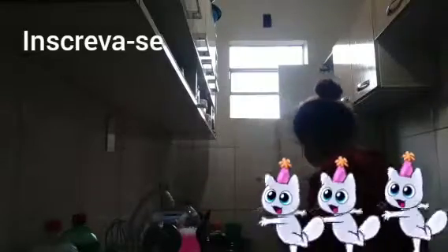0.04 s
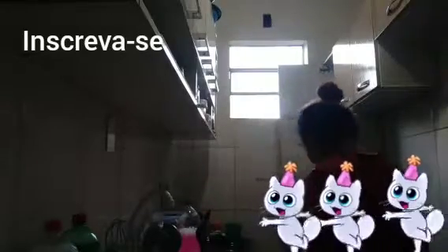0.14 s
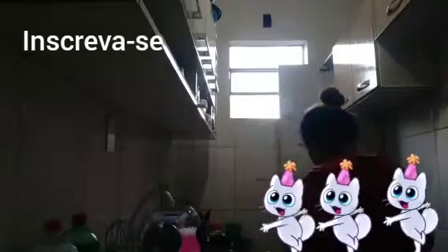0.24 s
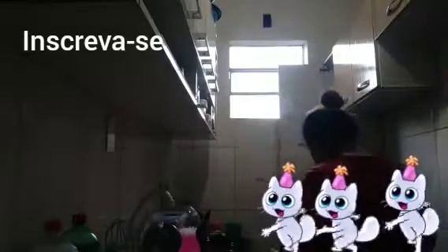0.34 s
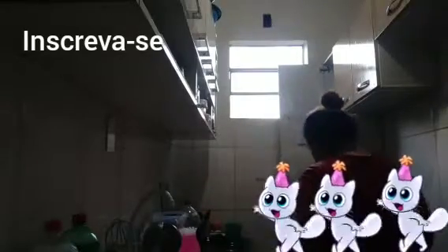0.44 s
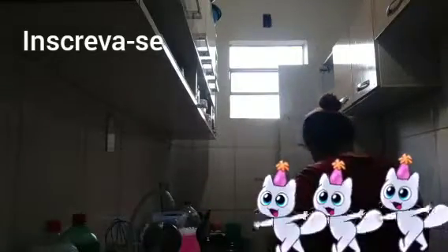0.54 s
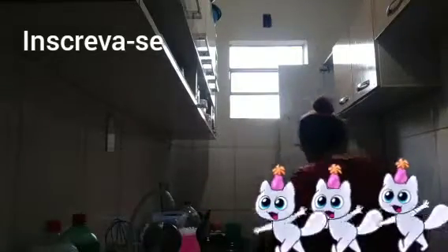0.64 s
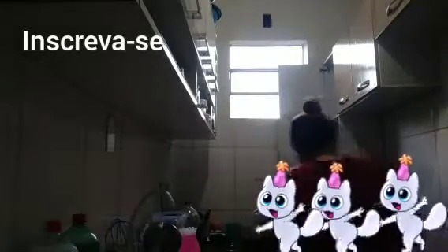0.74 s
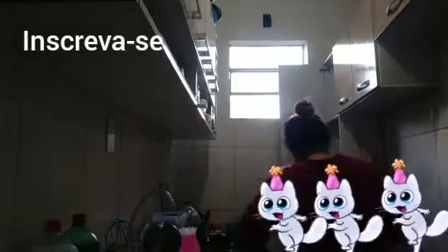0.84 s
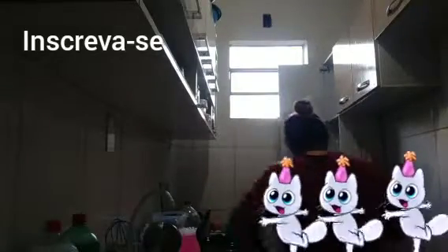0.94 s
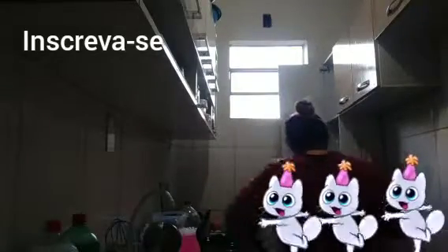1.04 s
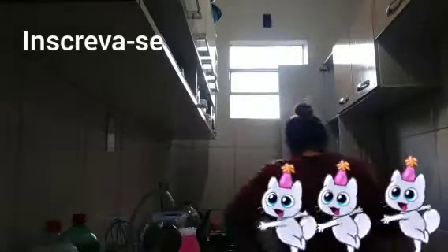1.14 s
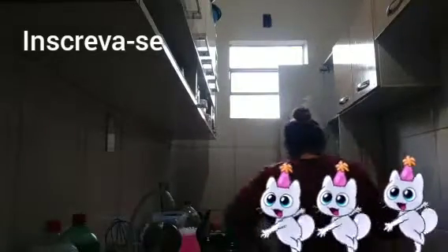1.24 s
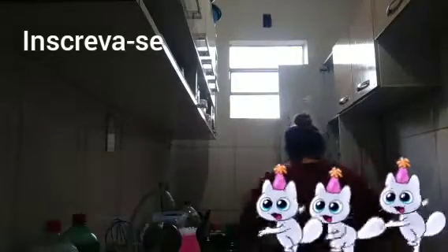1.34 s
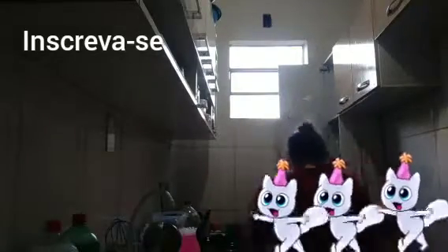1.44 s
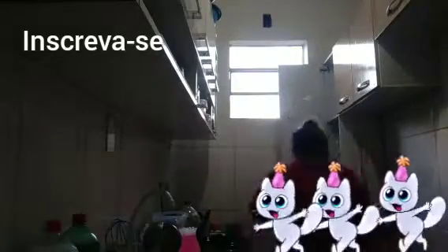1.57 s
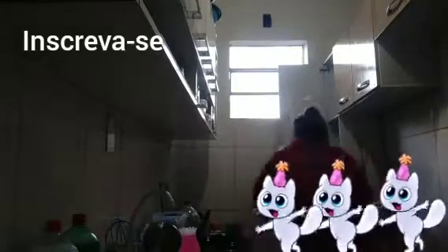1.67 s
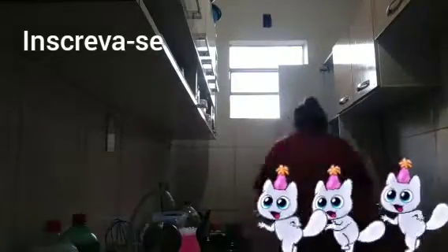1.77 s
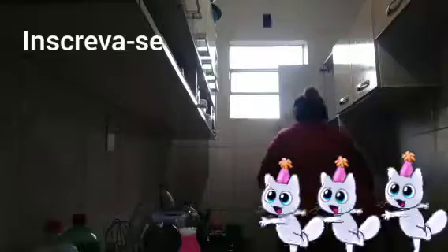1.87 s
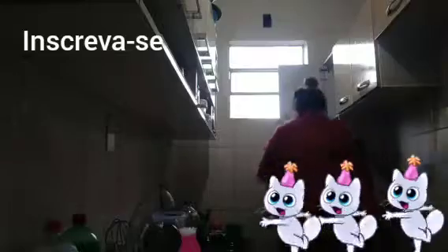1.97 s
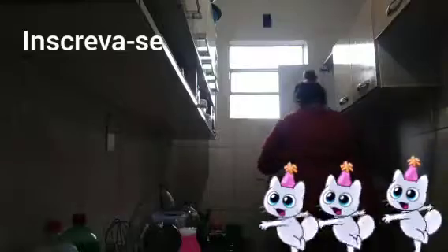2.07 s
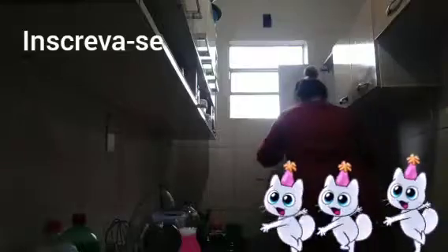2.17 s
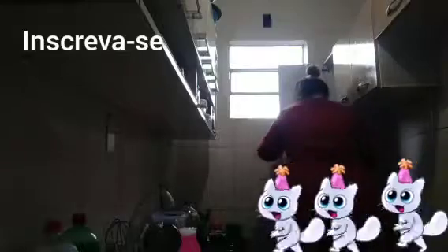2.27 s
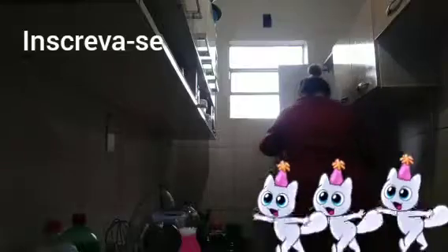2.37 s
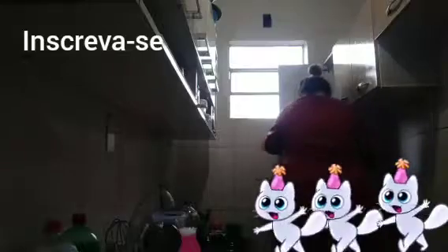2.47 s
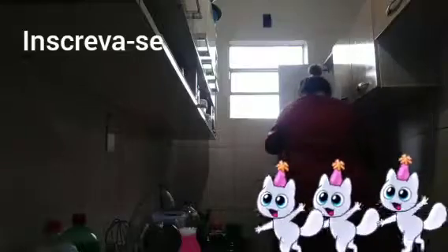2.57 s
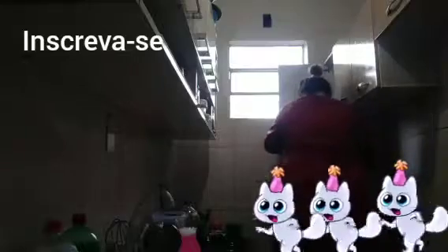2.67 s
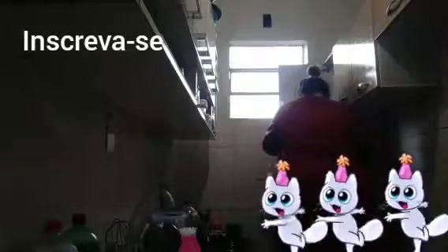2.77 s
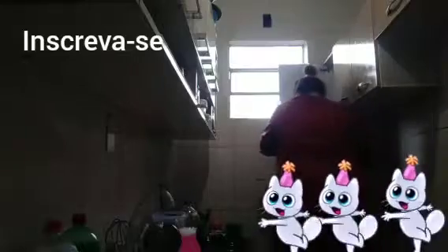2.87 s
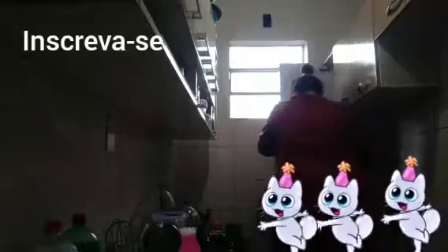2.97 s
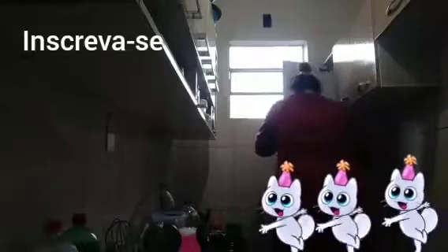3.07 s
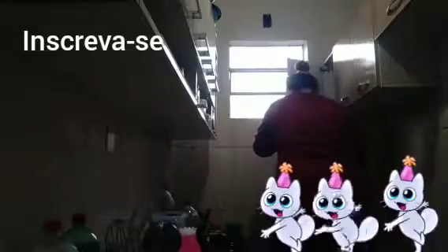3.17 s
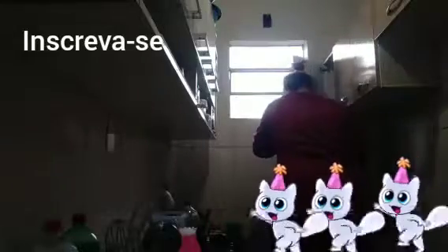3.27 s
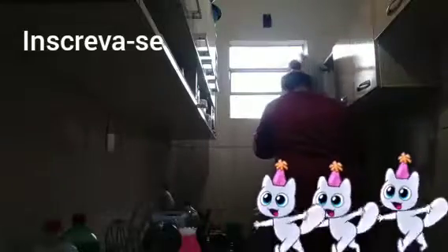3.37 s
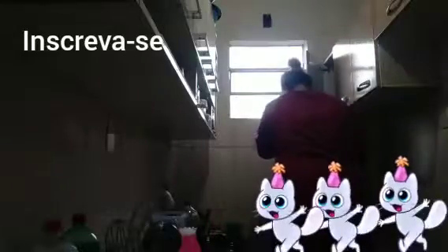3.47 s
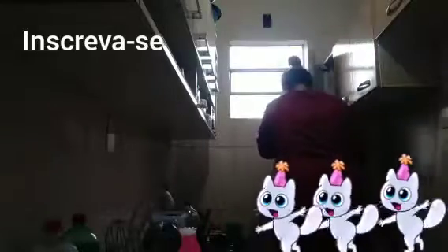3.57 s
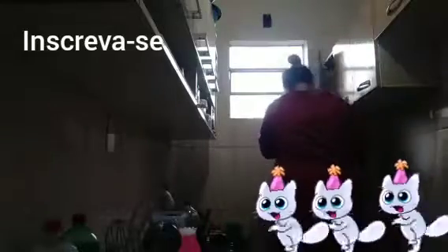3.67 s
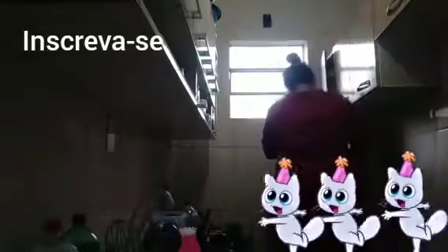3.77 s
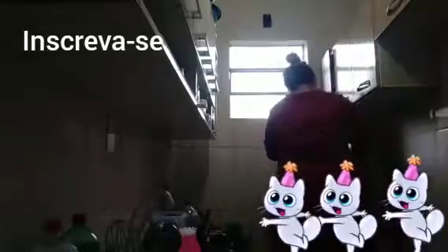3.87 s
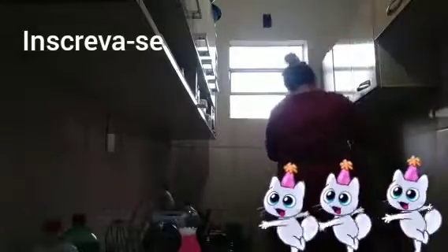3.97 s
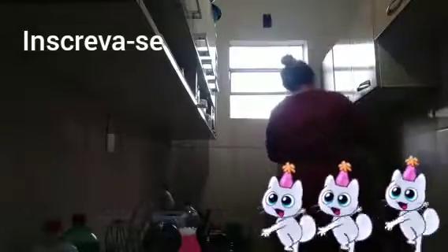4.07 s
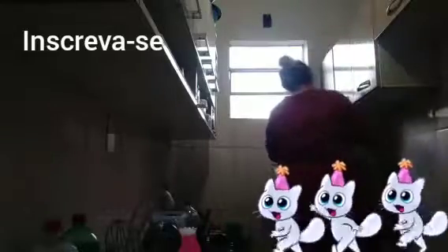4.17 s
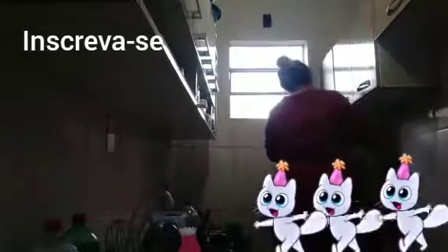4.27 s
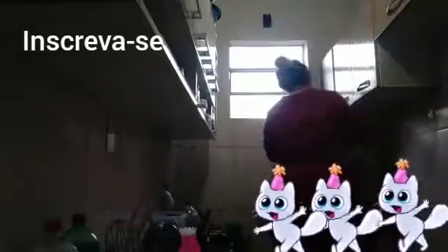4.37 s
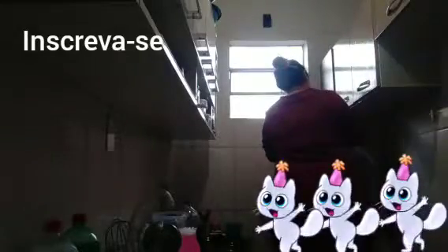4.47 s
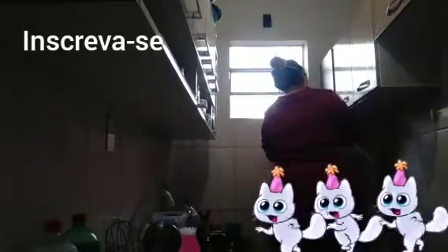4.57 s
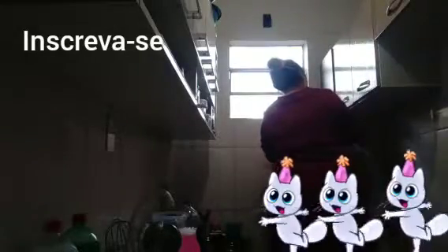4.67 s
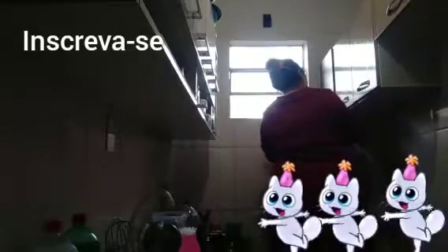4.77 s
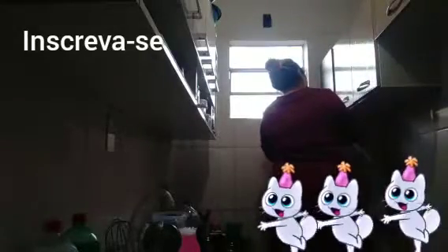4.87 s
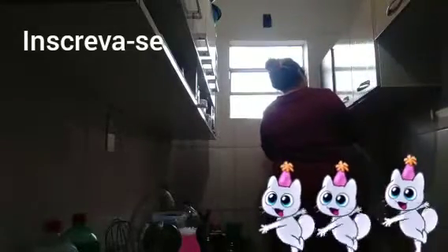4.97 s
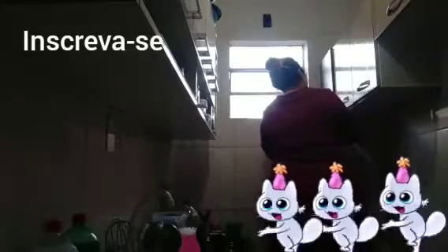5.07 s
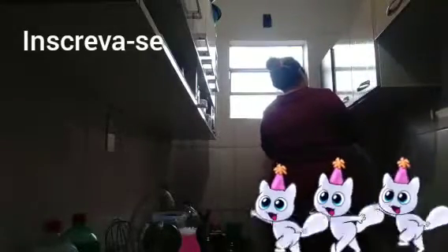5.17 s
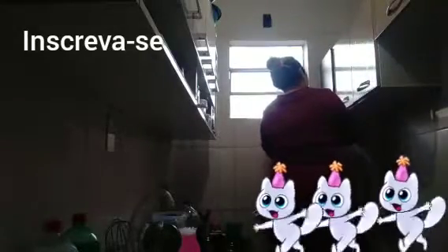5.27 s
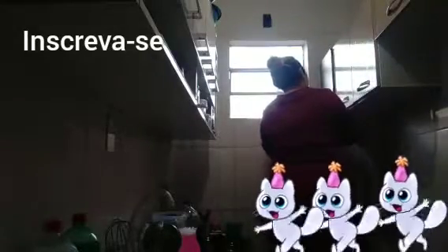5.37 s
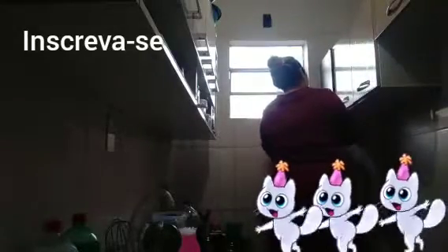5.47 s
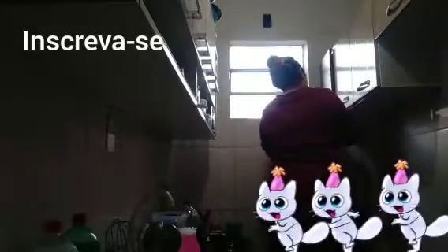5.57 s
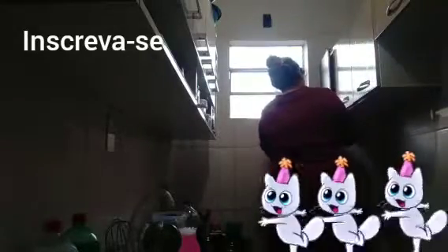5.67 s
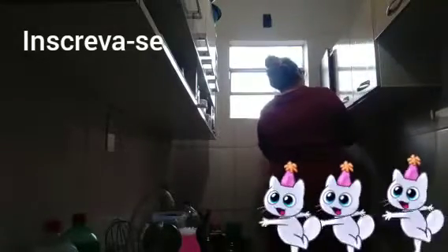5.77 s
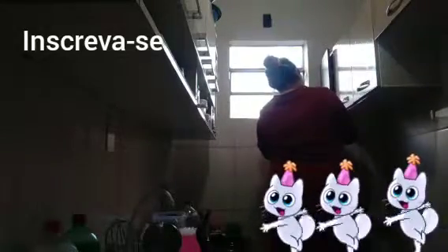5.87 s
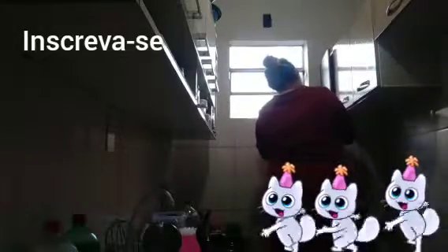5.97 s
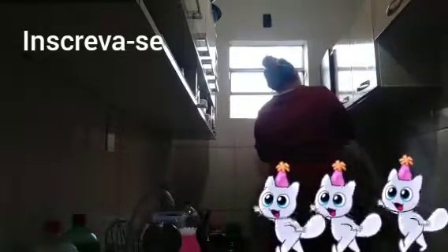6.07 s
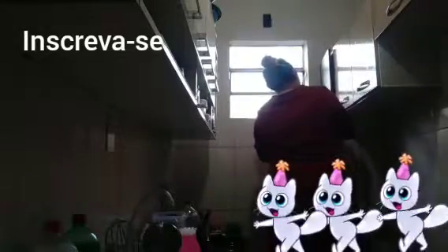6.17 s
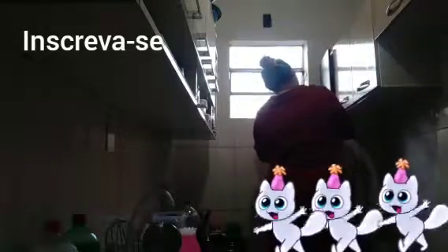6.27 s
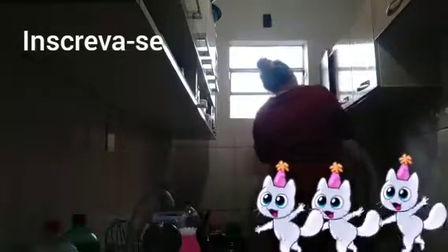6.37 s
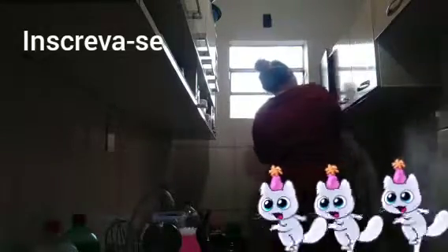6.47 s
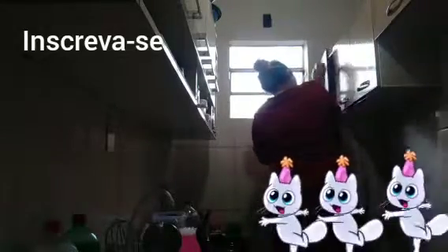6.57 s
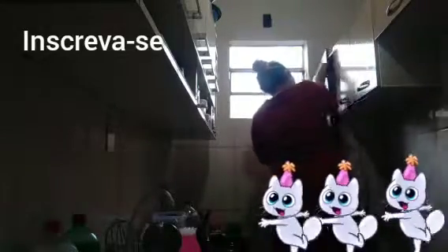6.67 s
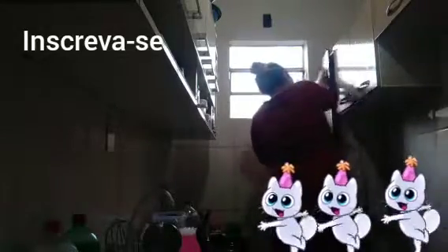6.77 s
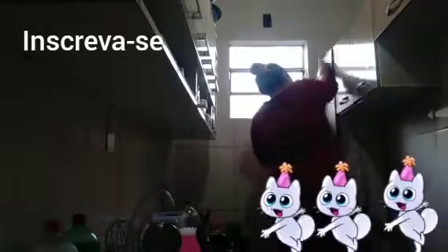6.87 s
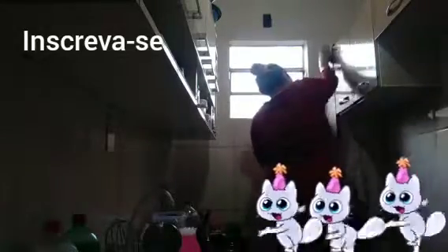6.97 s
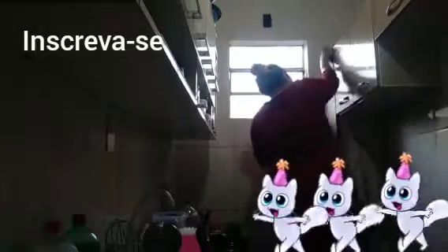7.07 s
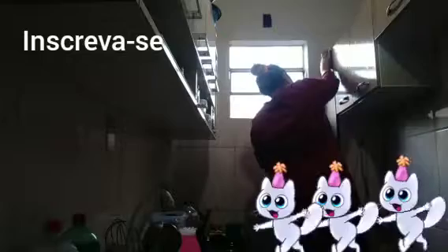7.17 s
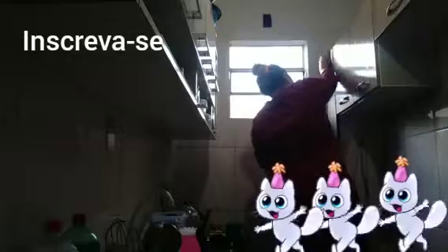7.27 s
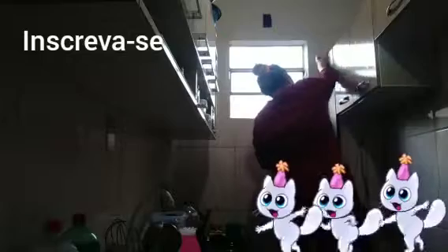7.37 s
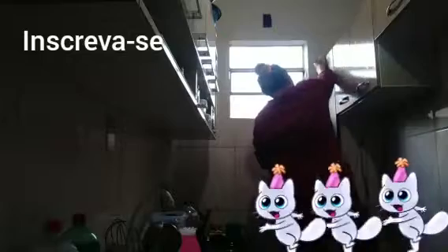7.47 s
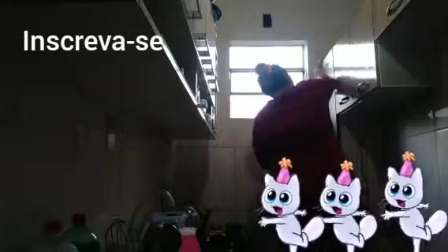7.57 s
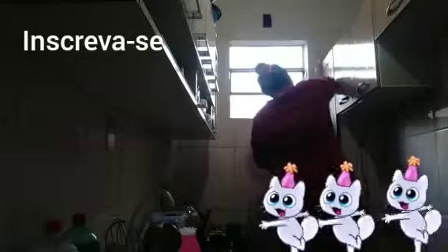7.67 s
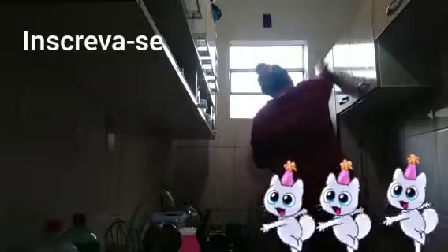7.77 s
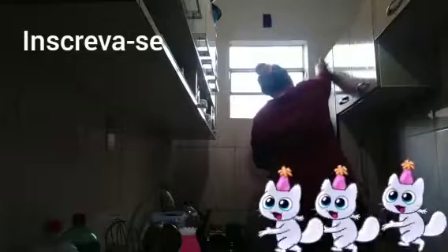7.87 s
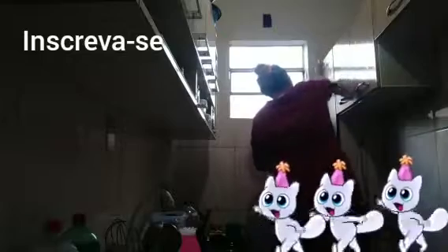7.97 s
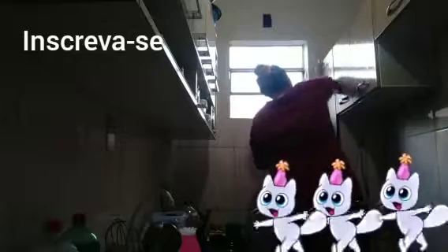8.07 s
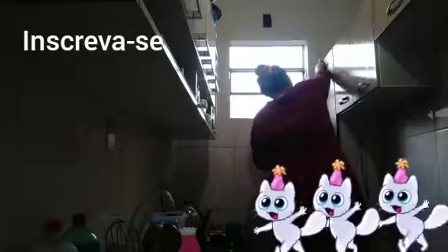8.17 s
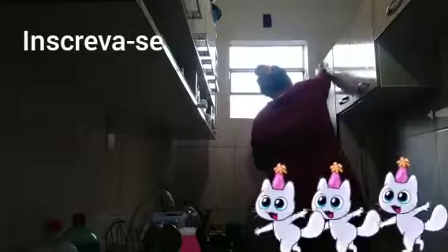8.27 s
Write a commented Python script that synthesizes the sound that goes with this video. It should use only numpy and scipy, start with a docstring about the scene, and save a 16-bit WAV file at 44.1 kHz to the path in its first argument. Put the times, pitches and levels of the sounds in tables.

```python
"""Sheet-steel wall-cabinet doors slam and bump in a narrow tiled kitchen: flexing doors swing as short sines
and knock on the ringing modes of sheet and carcass. A lower door bangs, a box taps and a catch springs open,
also as decaying modes. Small clicks, scuffs and rustles are shaped noise; hinges squeak and creak as stick-slip
overtones. The room answers with low modes and decaying noise tails over a hum and the hiss of a phone."""
import sys
import numpy as np
from scipy import signal
from scipy.fft import rfft, irfft
from scipy.io import wavfile
from scipy.ndimage import uniform_filter1d

SR = 44100
rng = np.random.default_rng(int(sys.argv[2]) if len(sys.argv) > 2 else 0)


def log_audio(samples):
    """Write samples as a 16-bit WAV file to the path given in sys.argv[1]."""
    # one column per channel
    frames = np.atleast_2d(samples).T
    # limit to full scale, then quantise
    limited = np.clip(frames, -1, 1)
    pcm = np.round(limited * 32767).astype(np.int16)
    wavfile.write(sys.argv[1], SR, pcm)


N = 367794  # samples


def undb(db):
    """Decibel law: level to amplitude ratio."""
    return 10 ** (np.asarray(db) / 20)


def unit(x):
    """Normalisation by the root mean square."""
    return x / np.sqrt(np.mean(x ** 2))


def band(x, hz, octaves, order=2):
    """Band-pass filtering of the given width around hz."""
    edges = np.clip(hz * 2 ** (np.array([-.5, .5]) * octaves), 10, SR / 2.1)
    return signal.sosfilt(signal.butter(order, edges, "bandpass", fs=SR, output="sos"), x)


def walk(rate):
    """Slow random modulation: levels drawn rate times a second and joined by ramps, spread near 1."""
    k = int(SR / rate)
    held = np.repeat(rng.standard_normal(N // k + 1), k)
    return 1.37 * uniform_filter1d(held, k)[:N]


def swell(start, rise, hold, db, fade):
    """Linear attack, hold and exponential decay: a gain that fades by so many dB a second."""
    t = np.arange(N) / SR - start
    attack = np.clip(t / max(rise, .002), 0, 1)
    fading = np.clip(t - rise - hold, 0, 2)
    return attack * undb(db - max(fade, 5) * fading)


def ring(modes, size=SR):
    """Modal superposition: decaying sines set off by one sharp push, scaled to peak 1."""
    t = np.arange(size) / SR
    out = np.zeros(size)
    for k, (hz, db, t60) in enumerate(modes):
        decay = 1000. ** (-t / t60)
        out += (-1) ** k * undb(db) * np.sin(2 * np.pi * hz * t) * decay
    return out / np.abs(out).max()


def add(out, s, x):
    """Linear superposition: mixes x into out from time s."""
    i = int(s * SR)
    out[i:i + len(x)] += x[:N - i]


# Steady noise spectrum. Each row: frequency in Hz, relative level per Hz in dB.
FLOOR = [(15, -16), (25, 2.5), (86, -7.5), (116, -2.5), (144, -10), (227, -15), (368, -20.5), (537, -22.5),
         (741, -25.5), (1340, -30.5), (3340, -35), (7910, -36), (15500, -39)]
FLOOR_RMS_DB = -52
# Low hum that swells and sinks. Each row: time in seconds, level in dB.
RUMBLE = [(0.0, -60), (.3, -54), (1.4, -51.5), (1.9, -64), (2.74, -46), (3.3, -58), (3.9, -55), (4.6, -61),
          (5.1, -59), (5.83, -58), (6.85, -57), (7.4, -57.5), (8.0, -41), (8.34, -52.5)]
# Narrow steady hiss. One row: centre in Hz, width in Hz, level in dB.
WHINE = (7980, 330, -70)


def floor():
    """Spectral shaping of Gaussian noise: room tone and microphone hiss, a wavering hum, a narrow high hiss."""
    hz = np.maximum(np.fft.rfftfreq(N, 1 / SR), 1)
    floor_hz, floor_db = np.array(FLOOR).T
    shape = undb(np.interp(np.log(hz), np.log(floor_hz), floor_db))
    mid, side = rfft(rng.standard_normal((2, N))) * shape
    side = side * np.clip(hz / 700, 0, 1)  # the bass is alike on both sides
    tone = undb(FLOOR_RMS_DB) * unit(irfft(np.array([mid + side, mid - side]), N))
    hum_db = np.interp(np.arange(N) / SR, *np.array(RUMBLE).T)
    hum = undb(hum_db) * unit(band(rng.standard_normal(N), 60.05, 0.15))
    whine_hz, width_hz, whine_db = WHINE
    whine_octaves = width_hz / whine_hz / np.log(2)
    whine = undb(whine_db) * unit(band(rng.standard_normal((2, N)), whine_hz, whine_octaves))
    return tone + hum + whine


RUSTLE_RISE_S, RUSTLE_RISE_SHARE = 0.0038, 0.18  # longer rubs start slower: share of the hold
RUSTLE_LOW_DB = -15.5  # low band: the shelf
# Rubbing and rustling of hands, sleeves and goods. Each row: start in seconds, hold in seconds,
# body level in dB before the mix, bright band relative to the body in dB, fade in dB per second.
RUSTLE = [(0.029, 0.015, -64.5, 2, 110), (0.153, 0.017, -68.5, 9, 131), (0.211, 0.014, -63.5, 8, 105),
          (0.444, 0.015, -72, -9, 93), (0.595, 0.028, -66.5, 6, 80), (0.775, 0.017, -63.5, 6, 48),
          (1.641, 0.075, -52, 5.5, 139), (2.598, 0.18, -58, -2.5, 74), (3.052, 0.018, -50, -2, 198),
          (3.099, 0.082, -50, 7, 296), (3.201, 0.1, -57, -3, 307), (3.285, 0.025, -55, -11, 248),
          (3.44, 0.16, -65, -10, 295), (3.561, 0.017, -49, -44, 110), (3.781, 0.17, -53, -3, 342),
          (3.998, 0.0076, -45, 2, 366), (5.569, 0.079, -64.5, 0, 65), (5.813, 0.042, -69, 2, 198),
          (5.997, 0.019, -70.5, 4, 153), (6.2, 0.22, -69, 9, 50), (6.526, 0.037, -58.5, -10, 148),
          (6.576, 0.04, -56, 5.5, 139), (6.832, 0.078, -60.5, 3, 215), (7.18, 0.39, -65.5, 9, 150),
          (7.688, 0.12, -68, 10, 194), (7.902, 0.09, -66, 9.5, 195), (8.092, 0.11, -65, 8, 159)]


def rustle():
    """Friction as dense tiny slips of uneven size, heard in a low, a body and a bright band."""
    slips = rng.standard_normal(N) * undb(2.9 * rng.exponential(size=N))
    slips = slips * undb(2.6 * walk(200) + 1.2 * walk(40))
    body = unit(band(slips, 3120, 1.9)) + undb(RUSTLE_LOW_DB) * unit(band(slips, 226, 2.9))
    bright = unit(band(slips, 8780, 2.1))
    out = np.zeros(N)
    for s, hold, db, bright_db, fade in RUSTLE:
        rise = RUSTLE_RISE_S + RUSTLE_RISE_SHARE * hold
        out += swell(s, rise, hold, db, fade) * (body + undb(bright_db) * bright)
    return out


CLICK_OCTAVES, CLICK_RISE_S = .9, .0015
# Catches, handles and small goods. Each row: start in seconds, level in dB before the mix, centre in Hz,
# decay time constant in ms, treble edge relative to the centre band in dB.
CLICKS = [(.052, -54.5, 3830, 7.8, 7.5), (.63, -37, 1540, 2.2, -8), (.769, -53.5, 3320, 17, 4.5),
          (1.35, -45.5, 3240, 6.8, -3.5), (1.387, -36, 2260, 24, -7), (1.6685, -29.5, 3020, 5.2, 3.5),
          (1.7415, -33, 4240, 2.2, 7.5), (2.346, -51, 3257, 12.2, -7.5), (2.544, -38.5, 3000, 18, -3.5),
          (2.583, -30, 2420, 3.4, -19), (2.5845, -23.5, 4700, 3.9, -4), (2.685, -37, 3130, 4.5, -19),
          (2.928, -35, 1970, 5.6, -15), (3.059, -31.5, 2500, 2.9, 5.5), (3.078, -52, 2500, 3.1, -1),
          (3.14, -33.5, 2520, 14, -4.5), (3.176, -45, 2440, 15, 9), (3.232, -39.5, 3220, 23, 6.5),
          (3.275, -35, 2800, 4.7, 6), (3.31, -27, 2600, 2.2, 1.5), (3.541, -41.5, 1940, 33, -27),
          (3.565, -27, 2760, 4.7, -35), (3.584, -29.5, 2040, 4.2, -42), (3.81, -45, 2350, 32, -16),
          (3.9644, -33.5, 2220, 8.6, -9), (4.385, -46.5, 8700, 7.5, -10), (4.4, -49.5, 1530, 9, -1),
          (4.519, -54.5, 2800, 6.3, 4), (5.651, -48, 3020, 10, -19), (5.778, -54, 3300, 21, 1.5),
          (5.836, -58, 4300, 30, -2), (5.885, -57, 3800, 13, -8), (6.03, -58, 3040, 3.6, -8),
          (6.926, -49, 1880, 5.4, -4), (6.933, -32.5, 3000, 7.7, -3.5), (6.945, -38, 2830, 6.5, -8),
          (8.272, -43.5, 3200, 11, 6)]


def clicks():
    """Impulsive noise: short decaying bursts, each a band round its centre plus a treble edge."""
    out, t = np.zeros(N), np.arange(SR // 8) / SR
    for s, db, hz, ms, treble_db in CLICKS:
        noise = rng.standard_normal(len(t))
        edge = unit(band(noise, 7800, 2.0))
        tone = unit(band(noise, hz, CLICK_OCTAVES, order=1)) + undb(treble_db) * edge
        envelope = np.exp(-1000 * t / max(ms, 1)) * np.minimum(t / CLICK_RISE_S, 1)
        add(out, s, undb(db) * tone * envelope)
    return out


# Each blow lands elsewhere: the modes shift by a share and sound in other proportions, in dB (both spreads).
SPOT_SHARE, SPOT_DB = .008, 2.5


def struck(blows, modes, rattle_hz, rattle_s, jingle_db):
    """Modal excitation: a half-sine contact (longer = duller) rings the modes and shakes loose parts."""
    body, loose = np.zeros(N), np.zeros(N)
    loose_decay = np.exp(-np.arange(SR // 4) / SR / rattle_s)
    for s, db, ms, rattle_db in blows:
        push = np.sin(np.pi * np.arange(0, 1, 1000 / SR / max(ms, .2)))
        spot = rng.standard_normal((len(modes), 2))
        here = [(hz * (1 + SPOT_SHARE * shift), mode_db + SPOT_DB * tilt, t60)
                for (hz, mode_db, t60), (shift, tilt) in zip(modes, spot)]
        add(body, s, undb(db) * np.convolve(push / push.sum(), ring(here, size=SR // 3)))
        add(loose, s, undb(db + rattle_db) * loose_decay)
    noise = rng.standard_normal(N)
    rattle = unit(band(noise, rattle_hz, 0.82, order=1))
    jingle = undb(jingle_db) * unit(band(noise, 8400, 0.12))
    return body + loose * undb(5.4 * walk(150)) * (rattle + jingle)


LOOSE_DB, LOOSE_DB_PER_MS = -10, 14.5  # softer contact shakes loose parts less
# Blows on the lower door. Each row: start in seconds, level in dB before the mix, contact in ms.
BANGS = [(0.629, -52, 0.23), (1.308, -41, 1.7), (1.369, -36, 0.7), (1.385, -12.5, 0.83), (1.407, -38, 0.71),
         (1.44, -22.5, 3.4), (1.467, -34, 0.61), (2.314, -35.5, 2.85), (2.344, -43, 0.51), (5.602, -49, 3),
         (5.651, -61, 0.4)]
# Modes of the lower door. Each row: frequency in Hz, relative level in dB, t60 in seconds.
DOOR = [(171, -14, 0.15), (265, 7, 0.047), (294, 0.5, 0.075), (355, 4, 0.05), (410, 1, 0.12),
        (453, -3, 0.07), (553, -5, 0.118), (637, -1.5, 0.053), (731, -13, 0.1113), (844, 4, 0.044),
        (964, 6.5, 0.039), (1144, 4.5, .035), (1450, 7, .02), (1980, 6.5, 0.02)]


def lower_door():
    """Impact on a plate: the contact time sets the brightness of the door's modes."""
    blows = [(s, db, ms, LOOSE_DB - LOOSE_DB_PER_MS * ms) for s, db, ms in BANGS]
    return struck(blows, DOOR, rattle_hz=1500, rattle_s=0.012, jingle_db=-36.0)


# A door flexes as it shuts, rebounds or is leaned on. Each row: start in seconds, flex level in dB before
# the mix, flex frequency in Hz, flex length in ms, knock level relative to the flex in dB before the mix.
BUMPS = [(1.39, -30, 105, 49, -33), (1.46, -28.5, 112, 75, -34), (2.585, -31.5, 121, 61, -7.5),
         (3.562, -56, 150, 7, 11.5), (3.958, -20, 150, 14, -9), (3.9755, -5, 115.8, 56, -25),
         (3.9966, -8, 169, 24, -14), (4.418, -32.5, 131, 20, -23.5), (4.69, -45.5, 124.7, 53, -16),
         (4.886, -32, 120.4, 74, -32), (5.718, -47, 119, 82, -13), (5.768, -48.5, 117, 33, -11),
         (5.891, -39.5, 117, 40, -29), (6.039, -45.5, 124.5, 73, -28), (6.204, -38, 125, 83, -17.5),
         (6.637, -44, 127, 59, -3.5), (6.923, -3.5, 142, 18.6, -16.5), (6.945, -19, 170, 9.4, -29),
         (6.951, -13, 91.3, 50, -16), (6.985, -19.5, 157, 13, -13), (7.021, -10, 111.6, 36, -37),
         (7.801, -32, 143, 25, -26), (7.883, -24, 117, 61, -31), (7.945, -25, 117, 12.8, -34),
         (8.21, -30.5, 175, 26, -40), (8.228, -22.5, 108.3, 61, -37)]
# Lowest modes of the narrow room. Each row: frequency in Hz, relative level in dB, t60 in seconds.
BOOM = [(24, 30.5, 3.3), (59, 4, 0.8), (95.2, 19.5, 0.66), (116.3, 20.5, 0.58), (170, 3, 0.46),
        (229, 3.5, 0.22)]


def flex(bumps):
    """Forced oscillation: a door swings a few cycles on its stops and pumps the lowest room modes."""
    swing = np.zeros(N)
    for s, db, hz, ms, _ in bumps:
        t = np.arange(0, max(ms, 5) / 1000, 1 / SR)
        arch = np.sqrt(np.sin(np.pi * t / t[-1]) + 1e-9)
        add(swing, s, undb(db) * np.sin(2 * np.pi * hz * t) * arch)
    return swing + undb(-54.5) * signal.fftconvolve(swing, ring(BOOM))[:N]


KNOCK_MS, KNOCK_LAG_S = 0.61, 0.001624  # the door meets the carcass just after it starts to flex
RATTLE_DB = -24  # loose parts, under the knock
# Door sheet and carcass of the wall cabinets. Each row: frequency in Hz, relative level in dB, t60 in seconds.
CABINET = [(170, 1, 0.17), (219, -10.5, 0.13), (248, -7.5, 0.15), (276.4, 1, 0.134), (344.4, -2.5, 0.13),
           (375.6, -6.5, 0.12), (402, -1.5, 0.1), (542, -8, 0.18), (598, -3, 0.093), (644, 0.5, 0.044),
           (834, 4, 0.032), (940, 1.5, 0.025), (1100, 0, 0.035), (1400, 2, 0.015)]


def cabinet_knocks(bumps):
    """Impact of plate on box: each bump rings the modes of the door sheet and the carcass."""
    knocks = [(s + KNOCK_LAG_S, db + knock_db, KNOCK_MS, RATTLE_DB) for s, db, _, _, knock_db in bumps]
    return struck(knocks, CABINET, rattle_hz=1108, rattle_s=0.017, jingle_db=-18.5)


# A hollow box set down. Each row: start in seconds, peak in dB before the mix.
TAPS = [(2.345, -36.5), (2.358, -45), (4.512, -55)]
# Modes of the box. Each row: frequency in Hz, relative level in dB, t60 in seconds.
BOX = [(530, 1, 0.084), (734, -5, 0.072), (1060, 3, 0.017), (1400, -2, 0.021)]


def box_taps():
    """Impulse response of a hollow box: each tap rings its modes."""
    out = np.zeros(N)
    for s, db in TAPS:
        add(out, s, undb(db) * ring(BOX))
    return out


# Steel catch springing open. Each row: start in seconds, peak in dB before the mix.
SNAPS = [(2.583, -25.5), (2.607, -46), (2.684, -37), (2.704, -40), (2.93, -43)]
# Modes of the catch. Each row: frequency in Hz, relative level in dB, t60 in seconds.
CATCH = [(2140, 1, 0.031), (2200, -11, 0.097), (2270, -1, 0.035), (2560, -6, 0.036), (2860, -10, 0.049),
         (5000, -24, 0.027)]


def catch_snaps():
    """Impulse response of a steel spring catch: each snap rings its modes."""
    out = np.zeros(N)
    for s, db in SNAPS:
        add(out, s, undb(db) * ring(CATCH))
    return out


# First bump, then the change from each bump to the next; the sag multiplies the flex frequency.
SHUDDER_S, SHUDDER_DB, SHUDDER_HZ, SHUDDER_MS, SHUDDER_KNOCK_DB = 2.604, -28.5, 155.3, 60, -7
SHUDDER_GAP_S, SHUDDER_FADE_DB, SHUDDER_SAG = .051, 1.93, .91


def shudder(count):
    """Damped vibration: even, weakening, sinking bumps of a door that trembles after it is pulled open."""
    return [(SHUDDER_S + k * SHUDDER_GAP_S, SHUDDER_DB - k * SHUDDER_FADE_DB,
             SHUDDER_HZ * SHUDDER_SAG ** k, SHUDDER_MS, SHUDDER_KNOCK_DB) for k in range(count)]


HINGE_S, HINGE_HOLD_S, HINGE_RISE_S, HINGE_HZ, HINGE_DB = 2.71, .17, .04, 795, -58
# Partials of the hinge plate. Each row: multiple of the slip rate, relative level in dB.
HINGE_PARTS = [(1, -12), (1.98, -4), (3.05, -7), (4.2, -5), (6.9, -19), (8.65, -17)]


def hinge():
    """Stick-slip friction: quick slips at a trembling rate ring the hinge plate."""
    rate = HINGE_HZ * (1 + .03 * walk(400) + .008 * walk(25))
    phase = 2 * np.pi * np.cumsum(rate) / SR
    plate = sum(undb(db) * np.sin(k * phase) for k, db in HINGE_PARTS)
    envelope = swell(HINGE_S, HINGE_RISE_S, HINGE_HOLD_S, HINGE_DB, fade=400)
    return envelope * undb(4.5 * walk(250)) * plate


CREAK_RISE_S, CREAK_FADE_DB_S, CREAK_TOP_HZ, WARBLE_HZ = .003, 900, 4400, 70
# Short creaks of hinges and shelves. Each row: start in seconds, hold in seconds, slip rate in Hz,
# end rate in Hz, level in dB before the mix, overtone slope in dB per octave, warble as a share of the slip rate.
CREAKS = [(4.363, .036, 1400, 1340, -53, -2, .1), (5.648, .05, 308, 300, -53, -2, .015),
          (5.764, .035, 910, 890, -59, -12, .02)]


def creaks(count):
    """Stick-slip in a joint: overtones of a gliding, trembling slip rate under frequency modulation."""
    out, t, tremble = np.zeros(N), np.arange(SR // 8) / SR, walk(270)
    for s, hold, hz, end_hz, db, tilt_db, share in CREAKS:
        rate = np.interp(t, [0, hold], [hz, end_hz]) * (1 + .012 * tremble[int(s * SR):][:len(t)])
        phase = 2 * np.pi * np.cumsum(rate) / SR
        warble = share * hz / WARBLE_HZ * np.cos(2 * np.pi * WARBLE_HZ * t)
        tone = np.zeros(len(t))
        for k in range(1, count + 1):
            if k * hz < CREAK_TOP_HZ:
                # k * k staggers the phases
                tone += undb(tilt_db * np.log2(k)) * np.sin(k * phase + k * k - warble)
        add(out, s, tone * swell(0, CREAK_RISE_S, hold, db, CREAK_FADE_DB_S)[:len(t)])
    return out * undb(2.5 * walk(200))


EARLY_DB, EARLY_S = 9, 0.038  # the nearest tiles and doors answer first, louder and briefly
PATHS_PER_S = 60  # how fast a swinging door changes the way to the walls
# Decay of the tiled room. Each row: frequency in Hz, t60 in seconds, relative level in dB.
ROOM = [(172, 0.92, -12), (244, 0.47, 0.5), (322, 0.77, -6.5), (714, 0.79, -3.5), (1270, 0.83, -10),
        (2280, 0.8, -5.5), (5400, 0.56, -6), (8320, 0.69, -2), (13400, 0.38, -21)]


def kitchen(x, count):
    """Diffuse reverberation: half-octave noise tails; the sound wanders between paths so no colour stands still."""
    t, tail = np.arange(SR // 2) / SR, 0
    room_hz, room_t60, room_db = np.array(ROOM).T
    for hz in 150 * 2 ** np.arange(0, 7, .5):
        t60 = np.interp(np.log(hz), np.log(room_hz), room_t60)
        db = np.interp(np.log(hz), np.log(room_hz), room_db)
        mid, side = unit(band(rng.standard_normal((2, count, 1, SR // 2)), hz, 0.58))
        share = np.clip((hz - 90) / 550, 0, 1)  # the bass is more alike on both sides
        stereo = mid + share * side * np.array([[1], [-1]])
        tail = tail + undb(db) * stereo * 1000. ** (-t / t60) / np.sqrt(t60 * SR)
    tail = tail * (1 + undb(EARLY_DB) * np.exp(-t / EARLY_S)) * (1 - np.exp(-t / 0.000063))
    paths = np.array([walk(PATHS_PER_S) for _ in range(count)])
    paths = paths / np.sqrt(np.sum(paths ** 2, axis=0) + 1e-9)  # constant total power
    return signal.oaconvolve((x * paths)[:, None], tail, axes=2).sum(axis=0)[:, :N]


LEFT_LAG = 8  # samples


def scene():
    """Superposition of direct sound, reverberation and steady floor."""
    rubs = rustle() + hinge()
    ticks = clicks() + box_taps() + catch_snaps()
    lower = lower_door()
    bumps = BUMPS + shudder(count=6)
    boom = flex(bumps)
    upper = cabinet_knocks(bumps)
    joints = creaks(count=14)
    direct = boom + undb(5.0) * upper + undb(7.0) * lower + undb(-6) * ticks + rubs + joints
    # the cabinets hang on one side: stronger left, yet heard there a little later
    pair = np.array([undb(.8) * np.roll(direct, LEFT_LAG), undb(-.8) * direct])
    to_walls = undb(-14) * boom + undb(-0.5) * upper + undb(4.0) * lower
    to_walls = to_walls + ticks + undb(3.0) * rubs + undb(-15) * joints
    return pair + kitchen(to_walls, count=3) + floor()


TOP_HZ = 15550


def record(dry):
    """Saturation and low-pass filtering: the phone rounds the loudest peaks and cuts the top."""
    rounded = np.tanh(.6 * dry) / .6
    return signal.sosfilt(signal.ellip(10, .2, 70, TOP_HZ, fs=SR, output="sos"), rounded)


dry = scene()
out = record(dry)
log_audio(out)
```